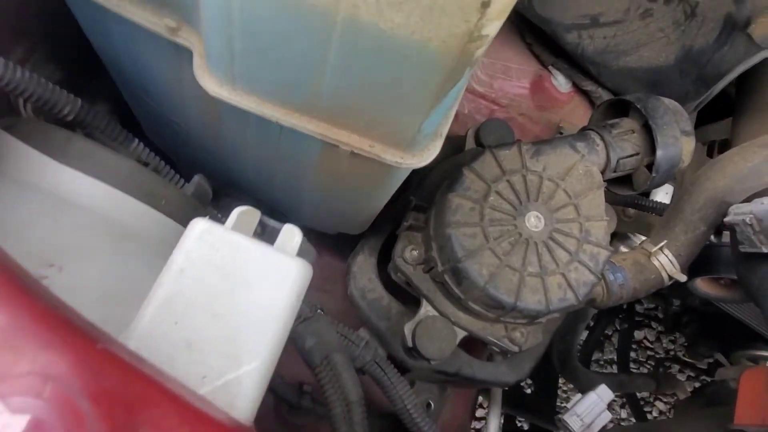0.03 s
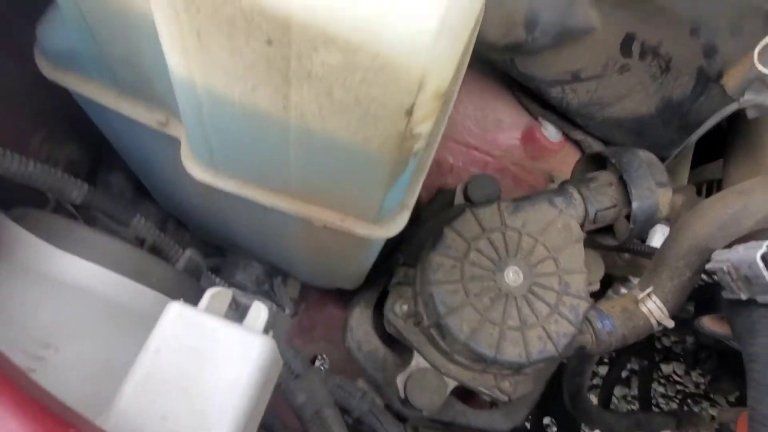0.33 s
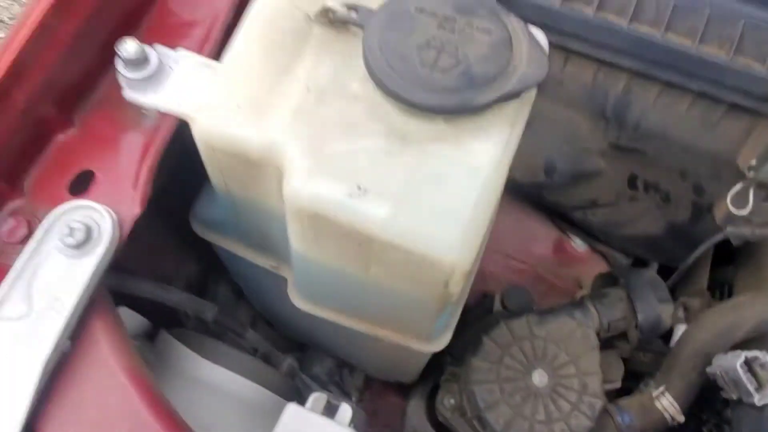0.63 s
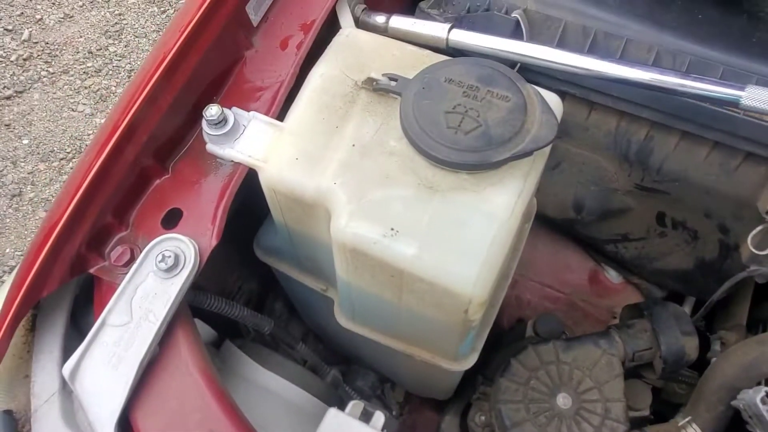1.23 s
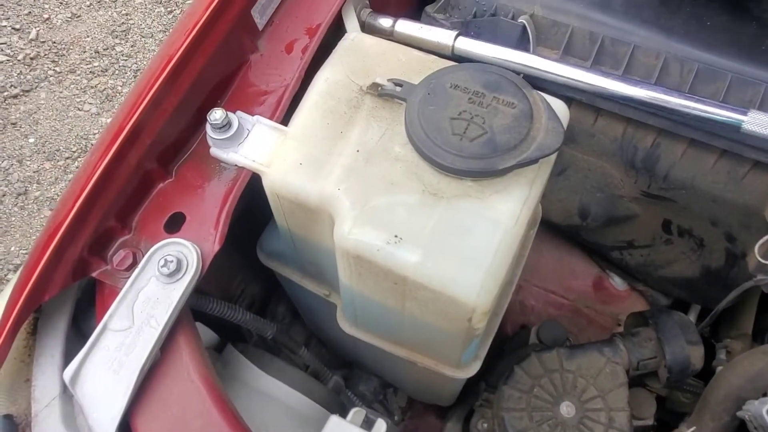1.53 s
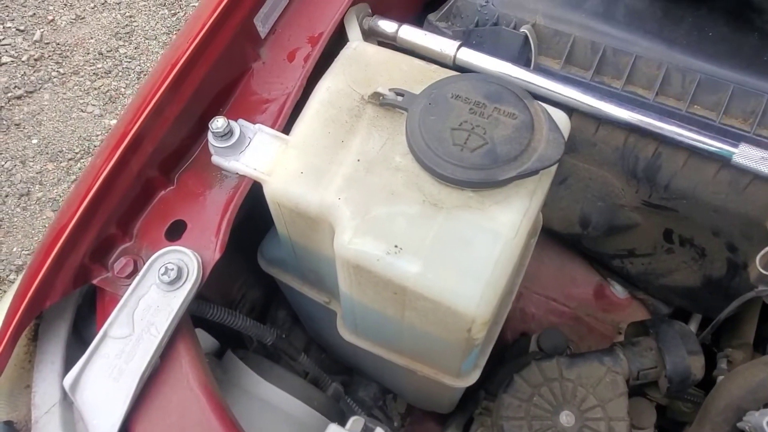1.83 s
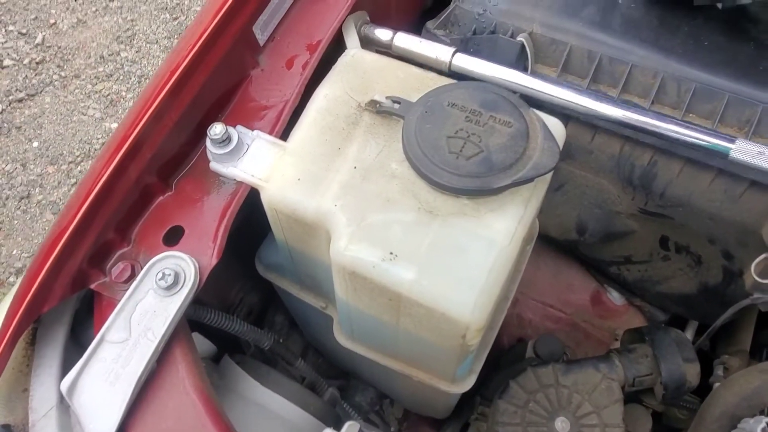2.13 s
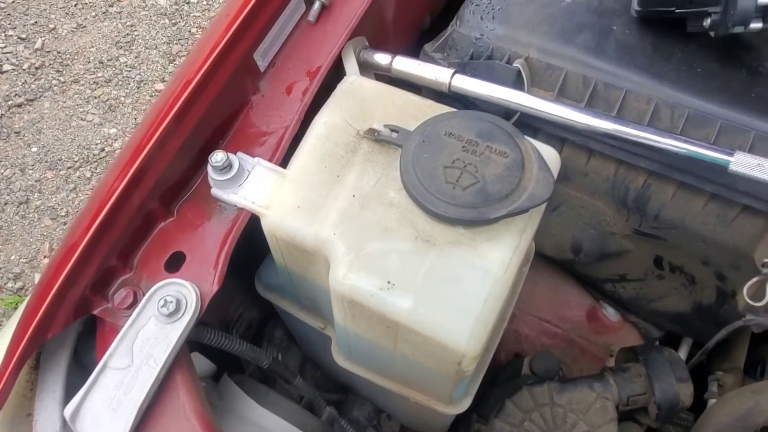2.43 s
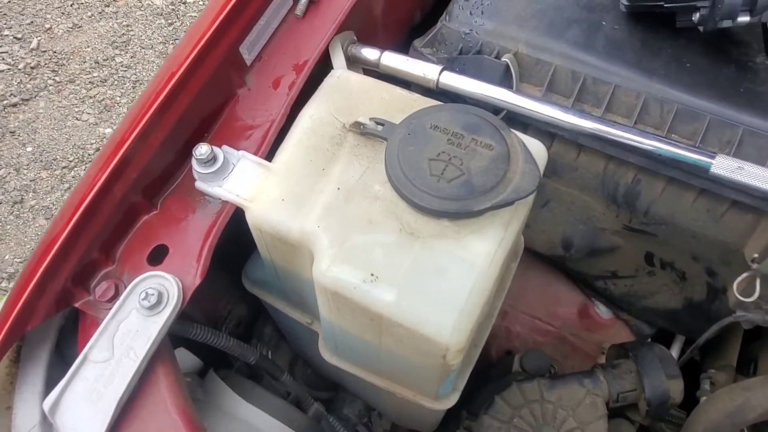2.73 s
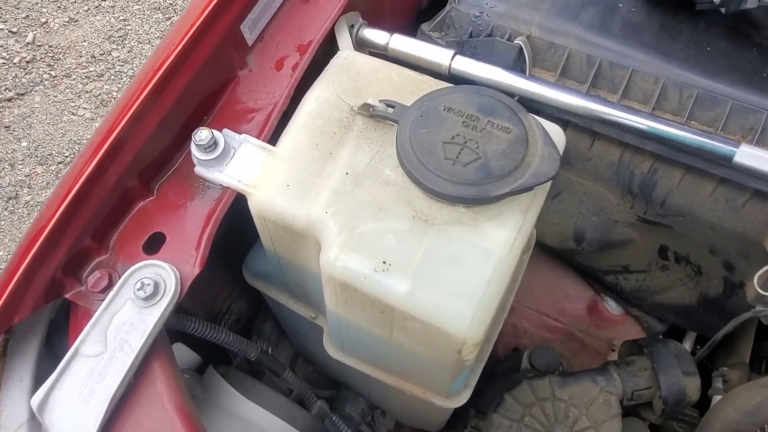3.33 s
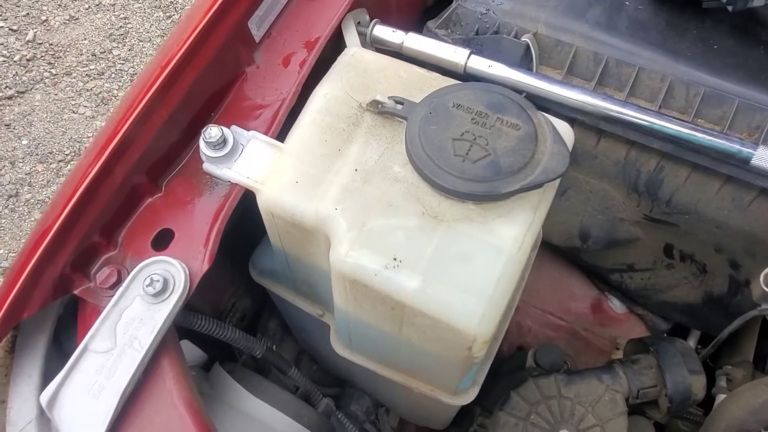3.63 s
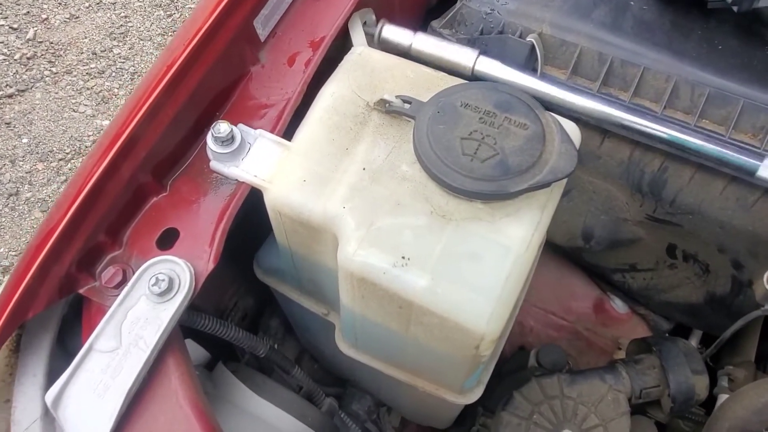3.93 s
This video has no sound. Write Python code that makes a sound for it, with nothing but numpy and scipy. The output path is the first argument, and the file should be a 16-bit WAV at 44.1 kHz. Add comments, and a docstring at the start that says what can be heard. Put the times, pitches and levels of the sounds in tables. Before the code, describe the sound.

Handling clicks and knocks, then a small electric pump buzzes and hisses in two short runs.

```python
"""A low outdoor rumble and a soft wash come first, heard from an engine bay. Close to the stereo
microphone, handling clicks, brushes and knocks on plastic; the knocks set a pump's housing ringing.
From about three seconds the small electric air pump whirrs in two short runs: air hisses through it,
its housing drones and buzzes, and a thin whine rises and sags. The bay adds a short echo."""
import sys
import numpy as np
from scipy import signal
from scipy.fft import rfft, irfft, next_fast_len
from scipy.io import wavfile
from scipy.ndimage import map_coordinates

SR = 44100
rng = np.random.default_rng(int(sys.argv[2]) if len(sys.argv) > 2 else 0)


def dump_mix(stems):
    """Bounce the given channels to the path in sys.argv[1] as a 16-bit WAV at rate SR."""
    frames = np.atleast_2d(stems).T  # one column per channel
    limited = np.clip(frames, -1, 1)  # hard clip at full scale
    pcm = np.round(limited * 32767).astype(np.int16)
    wavfile.write(sys.argv[1], SR, pcm)


N = 176400

# course of each outdoor layer (time [s], level [dB])
RUMBLE_LEVEL = [(0, -52.5), (.3, -49), (.5, -45), (.7, -42), (.85, -39.5), (1.0, -45.5), (1.14, -42.5),
                (1.22, -31.5), (1.3, -46), (1.37, -39.5), (1.51, -52), (1.68, -37), (1.79, -46),
                (1.86, -40.5), (2.3, -38.5), (2.52, -44), (2.63, -38.5), (2.95, -48), (3.25, -55),
                (3.6, -47.5), (3.76, -57), (4, -45.5)]
WASH_LEVEL = [(0, -64), (.25, -58.5), (.45, -53), (.6, -46.5), (.8, -45.5), (1.0, -48.5), (1.5, -48),
              (2.0, -44), (2.25, -45), (2.5, -48), (2.8, -46.5), (3.1, -50), (3.55, -54.5), (3.72, -63.5),
              (4, -63)]
FIZZ_LEVEL = [(0, -83.5), (.28, -82.5), (.5, -71), (.8, -64.5), (1.3, -65.5), (2.0, -68), (2.2, -66),
              (2.7, -63.5), (3.1, -65), (3.55, -74.5), (3.7, -78), (4, -72)]
FAR_WHIR_LEVEL = [(0, -82.5), (.5, -72), (1.0, -91)]
# their spectra (frequency [Hz], relative level [dB])
RUMBLE_SPECTRUM = [(15, -23), (28, -17), (42, -12), (62, 4.5), (80, -0.5), (110, -10.5), (200, -50),
                   (400, -69.5)]
WASH_SPECTRUM = [(50, -14.5), (110, 1.5), (200, -0.5), (400, -9), (700, -20), (1400, -24.5), (2200, -35.5),
                 (4000, -45.5), (7500, -58), (12000, -54.5)]
FIZZ_SPECTRUM = [(2000, -20.5), (4200, -16.5), (6200, -18.5), (7600, -26.5), (9000, -1.5), (10500, -0.5),
                 (12000, -6.5), (16000, -10)]
FAR_WHIR_SPECTRUM = [(900, -36), (1220, -11), (1380, 0.5), (1520, -14), (1900, -41.5)]
# the wash's treble opening up (time [s], gain [dB])
WASH_TREBLE = [(.3, -5), (.55, 0)]
# likeness of left and right, for the wash and for other noise (frequency [Hz], correlation [0..1])
WASH_LIKENESS = [(100, 0.96), (500, 0.87), (1500, 0.31), (4000, .15), (12000, .05)]
LIKENESS = [(60, 0.89), (150, 1), (450, 0.98), (950, 0), (1900, 0), (15000, 0)]

# light touches (time [s], level [dB])
CLICKS = [(0.436, -53), (0.763, -41)]
# strokes over the plastic (middle [s], half length [s], level [dB])
BRUSHES = [(0.462, 0.019, -64.5), (0.554, 0.018, -58.5), (0.637, 0.032, -53), (0.76, 0.067, -63.5),
           (1.311, 0.016, -64), (1.371, 0.018, -55), (1.647, 0.026, -54.5), (1.717, 0.031, -55),
           (2.19, 0.12, -53), (2.378, 0.034, -53), (2.502, 0.049, -55.5), (2.75, 0.022, -56.5)]
# handling knocks (time [s], thump [dB], clack [dB], crack [dB], tick [dB], tick left-right [dB],
# decay stretch [factor], pitch of the struck spot [Hz], its ring [dB])
KNOCKS = [(1.086, -23, -32.5, -61, -54, 9, 0.78, 759, -39),
          (1.095, -30.5, -43, -59.5, -54, 4, 2.6, 1060, -49),
          (1.836, -30.5, -40, -54, -49, 5, 1.47, 649, -43),
          (1.889, -26.5, -27, -27, -39.5, 10, 0.46, 1115, -33.5),
          (1.899, -29.5, -26.5, -37, -45, 6, 0.97, 662, -27.5),
          (2.086, -26, -43, -41, -18.5, 9, 0.66, 430, -33.5),
          (2.208, -33.5, -39.5, -49.5, -48.5, 8, 0.88, 497, -39),
          (2.298, -56, -45, -42.5, -33.5, 6, 0.74, 810, -50),
          (2.368, -59, -47, -67, -49, -3.5, 0.26, 2345, -38),
          (2.597, -49, -63, -57, -49.5, 7, 1.5, 3880, -45),
          (2.822, -50, -45, -42.5, -29, 0, 1.6, 970, -50.5),
          (2.839, -43.5, -47, -45.5, -37, 5, 3, 644, -45.5),
          (2.867, -30.5, -36, -23.5, -17, 2, 0.98, 940, -38.5),
          (2.889, -28, -22, -28, -18, 2, 0.92, 786, -14), (2.906, -16.5, -35, -29, -28, 1, 2.4, 749, -18.5),
          (2.9503, -13.5, -21, -16.5, -11.5, 5.5, .36, 693, -21),
          (2.967, -45, -42, -31, -17.5, 1, .9, 767, -50), (2.976, -41, -43, -27.5, -17, 3.5, 1, 765, -37.5),
          (2.991, -33.5, -36, -32.5, -20, 2.5, .7, 355.6, -30.5),
          (3.794, -68, -68, -65.5, -52.5, -2, 1, 764, -69),
          (3.824, -48, -51.5, -45, -29, 1.5, 0.61, 775, -53)]
# low housing modes rung by a thump (frequency [Hz], gain [dB], t60 [s])
THUMP_MODES = [(160.5, 4.5, 0.14), (270.2, -6, 0.15), (353.8, -6.5, 0.16), (446, -9.5, .11)]
# modes of the struck spot (multiple of its pitch [factor], gain [dB])
SPOT_MODES = [(1, 0), (1.15, -6)]
# contact envelopes (gain [dB], attack [s], hold [s], t60 [s])
CLICK = (1.9, 0.00014, 0.00079, 0.0088)
THUMP, CLACK = (-5, 0.04, 0.0226, 0.21), (0, 0.002, 0.012, 0.125)
CRACK, TICK = (0, 0.0005, 0.009, 0.11), (1.6, 0.0004, 0.004, 0.083)
# spectra of the close sounds: handling, housing and air (frequency [Hz], relative level [dB])
CLICK_SPECTRUM = [(300, -15), (1000, 16), (3000, -10), (6000, -2.5), (7600, -3), (10000, 9), (16000, 6.5)]
BRUSH_SPECTRUM = [(200, -12.5), (700, 14), (1500, 7.5), (2800, -5.5), (4500, -4.5), (7000, -26),
                  (9500, 0.5), (14500, 1.5), (16000, -6)]
LOW_BAND = [(40, -26), (100, -6), (160, -2.5), (300, -1), (480, -3), (650, -15.5), (1000, -49.5)]
MID_BAND = [(250, -39), (450, 3), (700, 7), (1000, 3), (1400, -3), (2200, -6.5), (3200, -35), (6000, -62.5)]
UPPER_BAND = [(700, -20), (1500, 0.5), (2500, -2.5), (4500, -1.5), (5800, -11), (7600, -18), (9500, -24.5),
              (14000, -50)]
TREBLE_BAND = [(4000, -49), (7000, -45.5), (8000, -17), (8700, -5), (10300, 4.5), (12500, -0.5), (14500, 4),
               (16000, -6)]
RUSH_SPECTRUM = [(400, -25.5), (1100, -5), (1900, 0), (3500, 0), (4800, -0.5), (6000, -5), (7600, -8),
                 (10000, -28)]
# housing resonances (frequency [Hz], width [Hz], boost [dB])
HOUSING_PEAKS = [(173, 57, 9), (262.6, 11, 8), (390.3, 24, 7.5), (616, 39, 0.5), (652.5, 49, 6.5),
                 (750, 39, 12.5), (907, 69, 7.5), (1128.4, 36, 8), (1307, 30, 7.5), (1484, 30, 6.5),
                 (2650, 250, 3.5), (3390, 47, 2), (3940, 120, 0.5)]

# one list for each pump run (time [s], drone [dB], buzz [dB], air [dB])
PUMP_RUNS = [
    [(3.135, -63, -68, -60), (3.161, -35, -45.5, -27), (3.186, -31.5, -32, -26), (3.228, -28, -30, -26),
     (3.355, -31.5, -30, -25.5), (3.393, -29, -30.5, -25), (3.435, -26.5, -24.5, -27.5),
     (3.458, -34, -37, -25.5), (3.487, -33, -38.5, -36), (3.515, -44.5, -56, -80), (3.56, -50.5, -86, -89)],
    [(3.812, -60, -62, -70), (3.824, -53.5, -64.5, -34), (3.85, -43, -48, -29.5),
     (3.868, -37.5, -30, -27.5), (3.896, -41, -34, -28.5), (3.908, -35, -35.5, -23.5),
     (3.922, -31.5, -27.5, -30), (3.938, -29.5, -31.5, -24), (3.972, -29.5, -33.5, -28.5),
     (4.0, -45, -38.5, -44)],
]
# hollow howl of the housing (time [s], pitch [Hz])
HOWL_PITCH = [(3.19, 755), (3.26, 715), (3.3, 757), (3.355, 710), (3.393, 757), (3.88, 757), (3.93, 700)]
# the whine of each run (start [s], start of the sag [s], spin-up time [s], level [dB])
WHINES = [(3.202, 3.425, 0.04, -34.5), (3.878, 3.912, 0.0233, -32.5)]

# decay of the engine bay's echo (frequency [Hz], t60 [s])
BAY_DECAY = [(150, 0.35), (1000, 0.22), (5000, 0.11), (12000, 0.12)]
# balance of the microphone's two ports (frequency [Hz], left-right [dB])
PORT_BALANCE = [(60, 0.5), (160, -4), (270, 1), (450, -5), (570, -3), (680, 0), (900, -5), (1250, 0),
                (1800, 3), (2600, 1), (4000, 3), (7000, -1), (8800, 8.5), (10300, 10.5), (12500, -3.5),
                (14500, -8.5), (16000, -12.5)]


def amp(db):
    """Decibels to gain."""
    return 10 ** (np.asarray(db) / 20)


def unit(x):
    """Scaled to rms 1."""
    return x / np.sqrt(np.mean(x ** 2) + 1e-20)


def clock():
    """The time of each sample."""
    return np.arange(N) / SR


def along(points, hz):
    """Interpolates (frequency [Hz], value) points on a log axis."""
    f, v = np.transpose(points)
    return np.interp(np.log(hz + 1), np.log(f + 1), v)


def levels(rows, outside_db=None):
    """One gain per sample for each dB column after the time."""
    times, *columns = np.transpose(rows)
    return np.array([amp(np.interp(clock(), times, db, outside_db, outside_db)) for db in columns])


def wobble(rate):
    """A smooth random curve, rate knots a second."""
    return map_coordinates(rng.standard_normal(int(N * rate / SR) + 4), [clock() * rate])


def tone(hz):
    """A sine of rms 1 on a moving pitch."""
    return np.sqrt(2) * np.sin(2 * np.pi * np.cumsum(hz) / SR)


def pan(db):
    """Constant-power gains, the left db above the right."""
    ratio = amp(np.atleast_1d(db))
    return np.array([ratio, np.ones_like(ratio)]) * np.sqrt(2 / (1 + ratio ** 2))


def filtered(x, response):
    """x times a response of frequency."""
    size = next_fast_len(N + SR // 2)
    return irfft(rfft(x, size) * response(np.fft.rfftfreq(size, 1 / SR)), size)[..., :N]


def lead(x, seconds):
    """The sound reaches the left port this much earlier than the right."""
    return filtered(x, lambda hz: np.exp(1j * np.pi * hz * seconds * np.array([[1], [-1]])))


def noise(spectrum, likeness=LIKENESS):
    """Stereo noise of rms 1, near mono in the bass."""
    def response(hz):
        spread = np.arccos(np.clip(along(likeness, hz), -1, 1)) / 2
        return amp(along(spectrum, hz)) * [np.cos(spread), np.sin(spread)]
    mid, side = filtered(rng.standard_normal((2, N)), response)
    return unit(np.array([mid + side, mid - side]))


def outdoors(muffle_hz=450):
    """Beyond the bay: a rumble, a wash from the left, muffled at first, faint fizz and a far whir."""
    wash = lead(noise(WASH_SPECTRUM, WASH_LIKENESS), seconds=0.00036)
    dull = filtered(wash, lambda hz: 1 / (1 + (hz / muffle_hz) ** 4))
    wash = dull + levels(WASH_TREBLE) * (wash - dull)
    fizz = amp(0.5) * levels(FIZZ_LEVEL) * noise(FIZZ_SPECTRUM) * pan(db=5.5)
    rumble = amp(1) * levels(RUMBLE_LEVEL) * noise(RUMBLE_SPECTRUM)
    whir = levels(FAR_WHIR_LEVEL) * noise(FAR_WHIR_SPECTRUM)
    return rumble + levels(WASH_LEVEL) * wash + fizz + whir


def burst(start, gain_db, attack, hold, t60, stretch=1):
    """Attack, hold and decay of a contact; stretch lengthens the decay."""
    out, first = np.zeros(N), int(start * SR) + 1
    t = np.arange(first, min(first + SR // 3, N)) / SR - start
    fall_db = 60 * np.maximum(t - hold, 0) / (t60 * stretch)
    out[first:first + len(t)] = (1 - np.exp(-t / attack)) * amp(gain_db - fall_db)
    return out


def clicks():
    """Light touches, close and hard left, that leave no ring."""
    touches = sum(amp(db) * burst(start, *CLICK) for start, db in CLICKS)
    return touches * noise(CLICK_SPECTRUM) * pan(db=23.0)


def brushes():
    """Handling rubs the plastic in soft, grainy swishes, a little left of the microphone."""
    strokes = sum(amp(db) * np.exp(-((clock() - middle) / half) ** 2) for middle, half, db in BRUSHES)
    grain = amp(2.1 * wobble(330))
    return strokes * grain * noise(BRUSH_SPECTRUM) * pan(db=3.0)


def mode(t, hz, db, attack, t60):
    """One ringing mode: a decaying sine."""
    return amp(db - 60 * t / t60) * (1 - np.exp(-t / attack)) * np.sin(2 * np.pi * hz * t)


def housing_noise(spectrum, ripple_db=3.7, ripple_hz=65):
    """Noise that rings in the housing's main resonances and, higher up, in many small ones."""
    knots = rng.standard_normal(SR // ripple_hz)

    def response(hz):
        peaks = sum((amp(db) - 1) / (1 + (2 * (hz - f) / width) ** 2) for f, width, db in HOUSING_PEAKS)
        depth_db = ripple_db * np.clip(hz / 1000 - .5, 0, 1)
        return (1 + peaks) * amp(depth_db * map_coordinates(knots, [hz / ripple_hz]))
    return unit(filtered(noise(spectrum), response))


def knocks(spot_cycles=85):
    """Each close knock thumps the housing and rings the struck spot, with a clack, crack and tick."""
    power, ring = np.zeros((4, 2, N)), np.zeros(N)
    for start, thump, clack, crack, tick, side, stretch, spot_hz, spot_db in KNOCKS:
        power[0] += (amp(thump) * burst(start, *THUMP)) ** 2
        power[1] += (amp(clack) * burst(start, *CLACK, stretch)) ** 2
        power[2] += (amp(crack) * burst(start, *CRACK, stretch)) ** 2
        power[3] += (amp(tick) * pan(side) * burst(start, *TICK, stretch)) ** 2
        first = round(start * SR)
        t = clock()[first:first + SR // 2] - start
        low = sum(mode(t, hz, thump + db, attack=0.0024, t60=t60 * np.clip(stretch, .6, 1))
                  for hz, db, t60 in THUMP_MODES)
        spot = sum(mode(t, spot_hz * ratio, spot_db + db, attack=0.0014,
                        t60=spot_cycles / (spot_hz * ratio)) for ratio, db in SPOT_MODES)
        ring[first:first + len(t)] += low + spot
    rattle = unit(amp(1.33 * wobble(600)))
    bands = [housing_noise(band) for band in (LOW_BAND, MID_BAND, UPPER_BAND)] + [noise(TREBLE_BAND)]
    return lead(ring, seconds=0.00012) + rattle * np.sum(np.sqrt(power) * bands, axis=0)


def pump(drone_hz=161, chatter_hz=83.7, chatter_depth=0.14):
    """The housing drones, buzzes and howls, close on the right, as chattering air hisses through."""
    drone_gain, buzz_gain, air_gain = sum(levels(run, outside_db=-120) for run in PUMP_RUNS)
    chatter = 1 + chatter_depth * tone(chatter_hz * (1 + .1 * wobble(40)))
    chatter *= amp(0.63 * wobble(60))  # the level flutters slightly
    hum = tone(drone_hz * (1 + .04 * wobble(70)))
    drone = amp(-2) * hum + amp(-2.5) * housing_noise(LOW_BAND)
    howl_hz = np.interp(clock(), *np.transpose(HOWL_PITCH))
    howl = tone(howl_hz * (1 + 0.02474 * wobble(220)))
    rasp = unit(amp(2.5 * wobble(220)))
    buzz = rasp * (amp(-1.5) * housing_noise(MID_BAND) + amp(-5.5) * howl)
    rush = amp(-7) * rasp * housing_noise(RUSH_SPECTRUM)
    hiss = amp(3) * housing_noise(TREBLE_BAND)
    housing = lead(drone_gain * drone + chatter * buzz_gain * buzz, seconds=-0.00027)
    return housing + chatter * air_gain * (rush + hiss)


def whine(start_hz=2270, top_hz=2767, sag_hz_per_s=10300, attack_s=0.0081, release_s=0.035):
    """The pump's whine climbs towards its top pitch as it spins up, then sags and fades."""
    out = np.zeros((2, N))
    for start, sag_start, spin_up, db in WHINES:
        running, sagging = np.maximum(clock() - start, 0), np.maximum(clock() - sag_start, 0)
        hz = top_hz - (top_hz - start_hz) * np.exp(-running / spin_up) - sag_hz_per_s * sagging
        gain = amp(db) * np.minimum(running / attack_s, 1) * np.exp(-(sagging / release_s) ** 2)
        flutter = amp(2.2 * np.array([wobble(160), wobble(160)]))
        out += gain * flutter * tone(hz * (1 + 0.012 * wobble(800)))
    return out


def bay_echo(x):
    """The short echo of the engine bay, longest in the bass."""
    hz, t, spectra = signal.stft(rng.standard_normal((2, SR // 2)), SR, nperseg=256)
    decay = amp(-60 * t / along(BAY_DECAY, hz)[:, None])
    tail = signal.istft(spectra * decay, SR, nperseg=256)[1]
    return signal.fftconvolve(x, tail / np.linalg.norm(tail[0]), axes=1)[:, :N]


def scene():
    """Pump and handling close up in the engine bay, with the outdoors behind."""
    near = pump() + whine() + knocks() + clicks() + brushes()
    return near + amp(-15) * bay_echo(near) + outdoors()


def record(dry, top_hz=16000, rolloff_hz=500):
    """The microphone: each port has its own colour, peaks clip, and the highest treble is cut."""
    coloured = filtered(dry, lambda hz: pan(along(PORT_BALANCE, hz)))
    clipped = np.clip(coloured, -1, 1)
    return filtered(clipped, lambda hz: np.clip((top_hz - hz) / rolloff_hz + .5, 0, 1) ** 2)


dry = scene()
out = record(dry)
dump_mix(out)
```